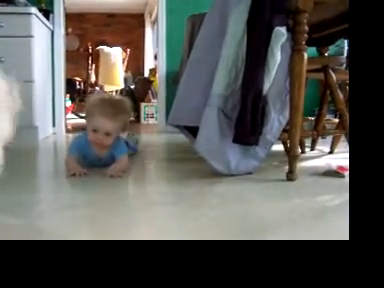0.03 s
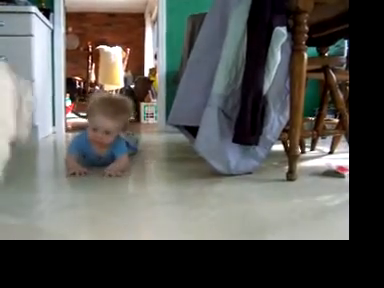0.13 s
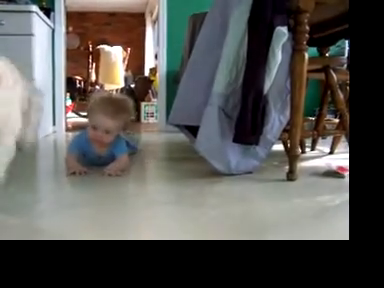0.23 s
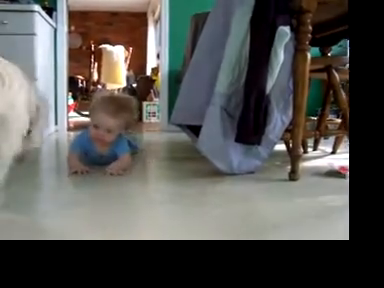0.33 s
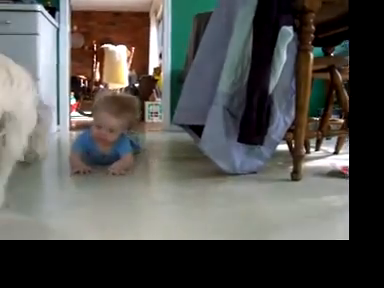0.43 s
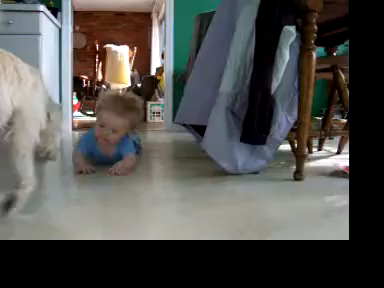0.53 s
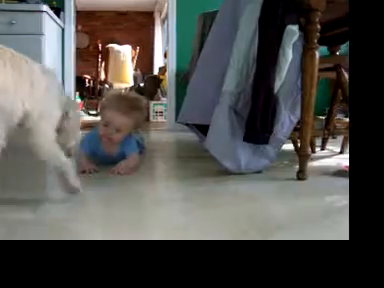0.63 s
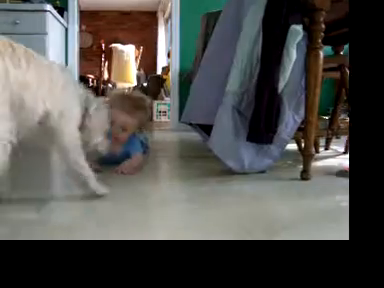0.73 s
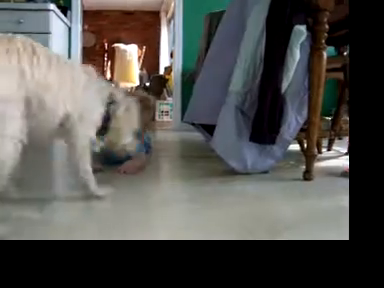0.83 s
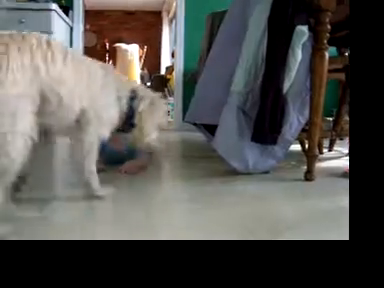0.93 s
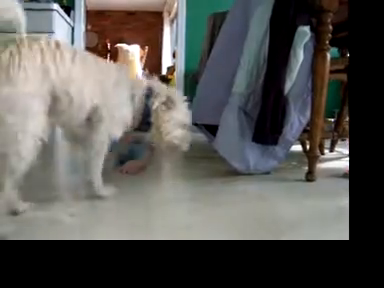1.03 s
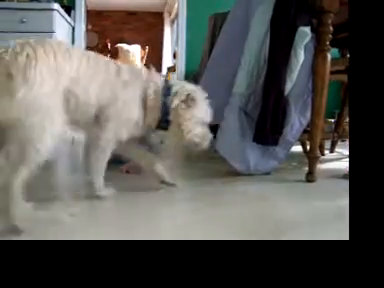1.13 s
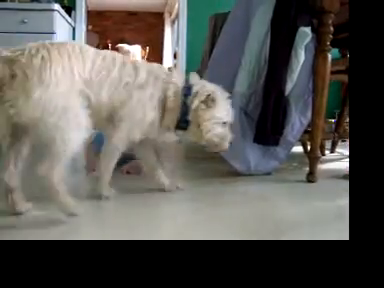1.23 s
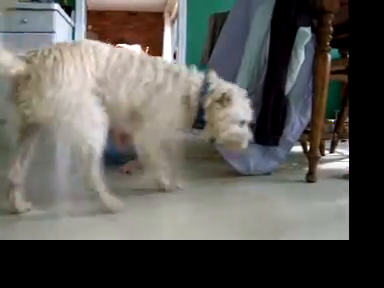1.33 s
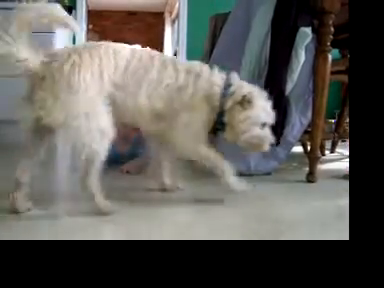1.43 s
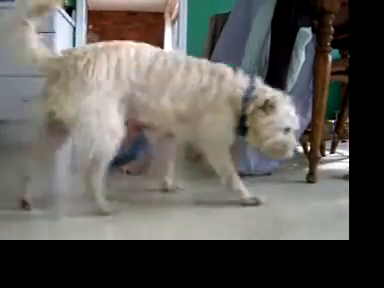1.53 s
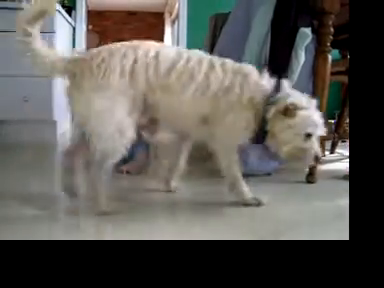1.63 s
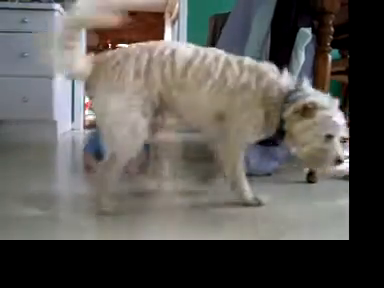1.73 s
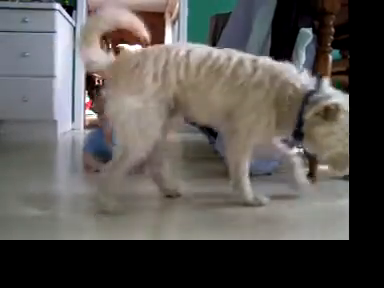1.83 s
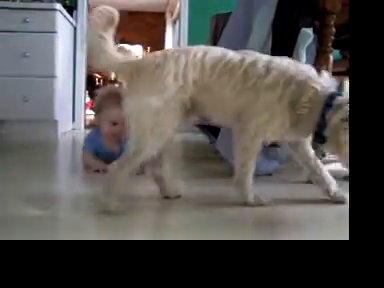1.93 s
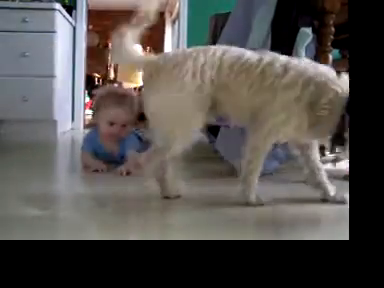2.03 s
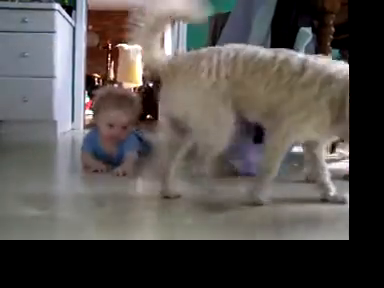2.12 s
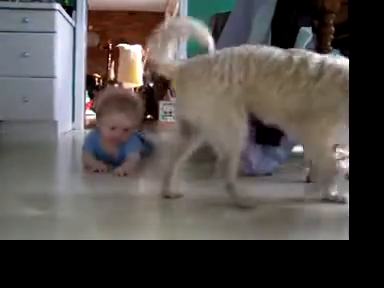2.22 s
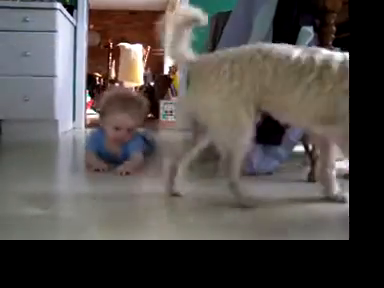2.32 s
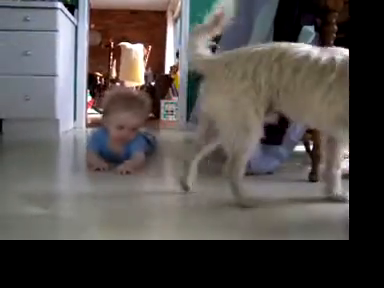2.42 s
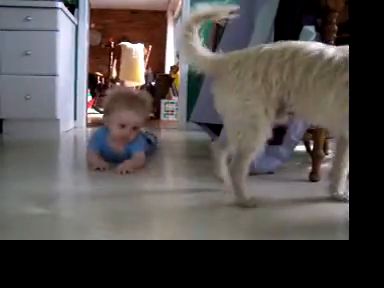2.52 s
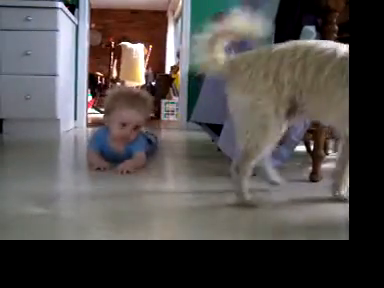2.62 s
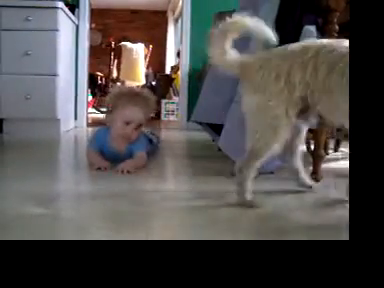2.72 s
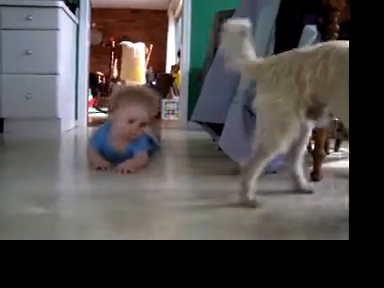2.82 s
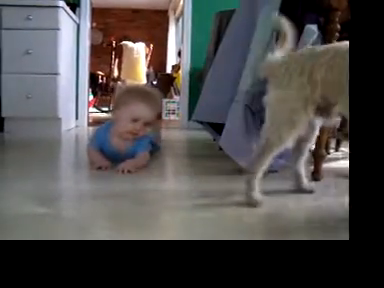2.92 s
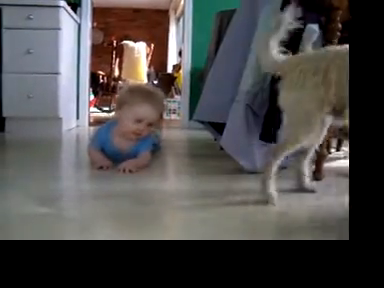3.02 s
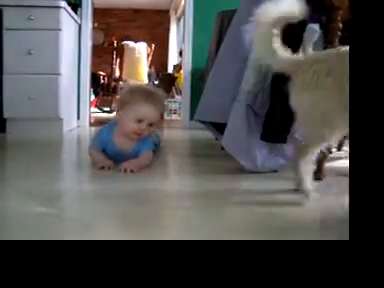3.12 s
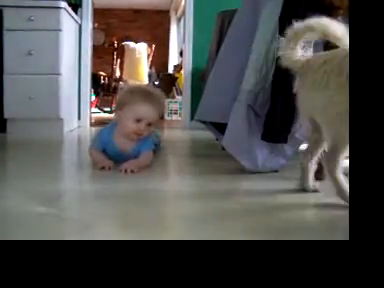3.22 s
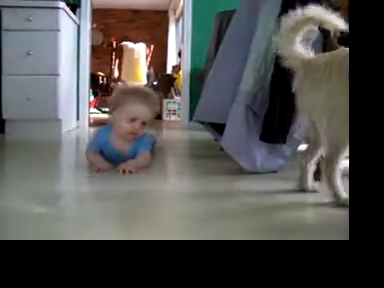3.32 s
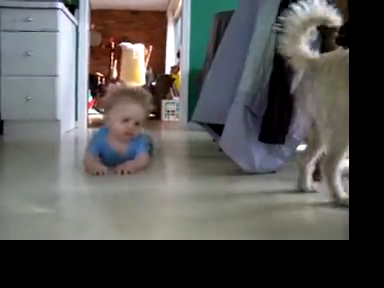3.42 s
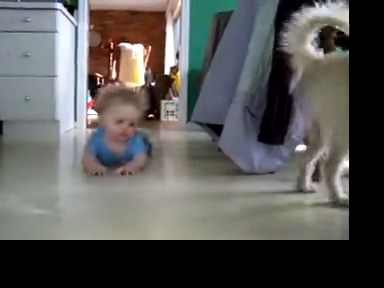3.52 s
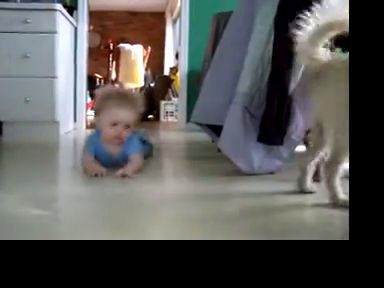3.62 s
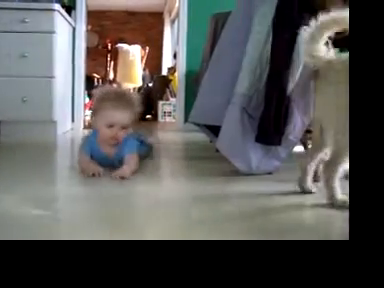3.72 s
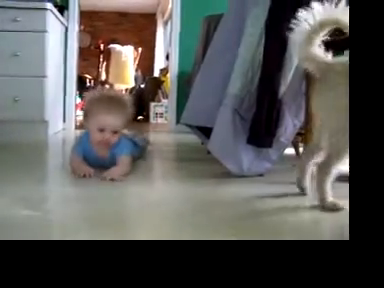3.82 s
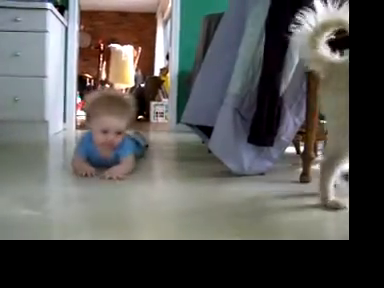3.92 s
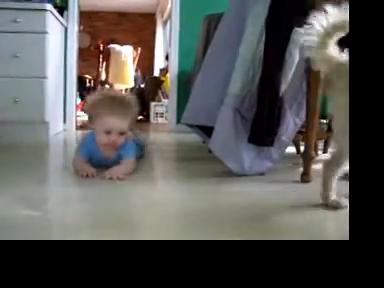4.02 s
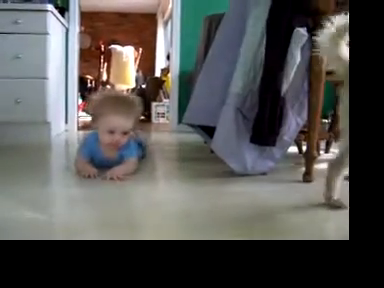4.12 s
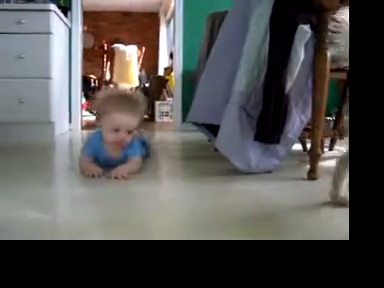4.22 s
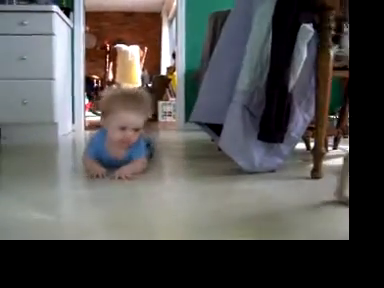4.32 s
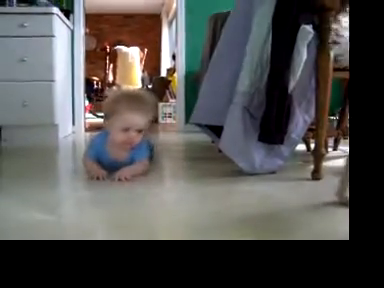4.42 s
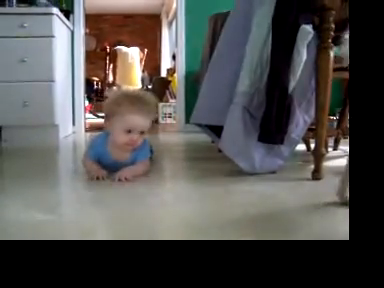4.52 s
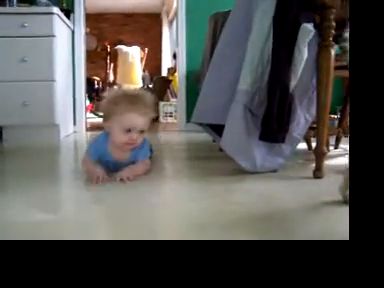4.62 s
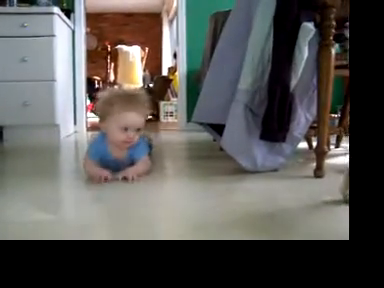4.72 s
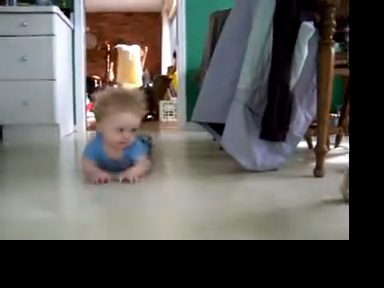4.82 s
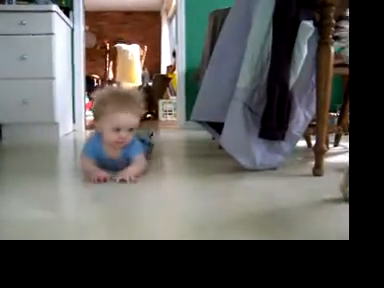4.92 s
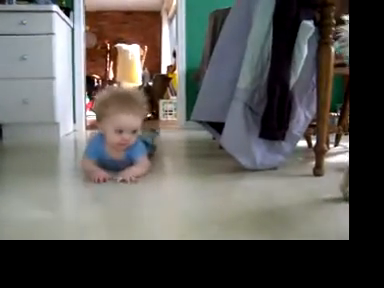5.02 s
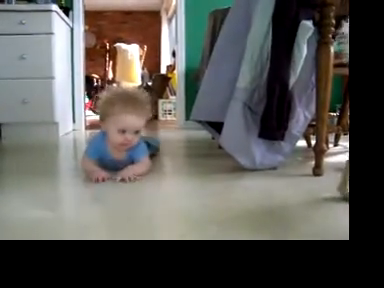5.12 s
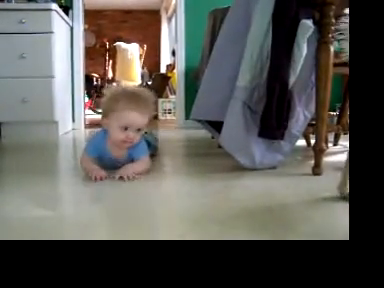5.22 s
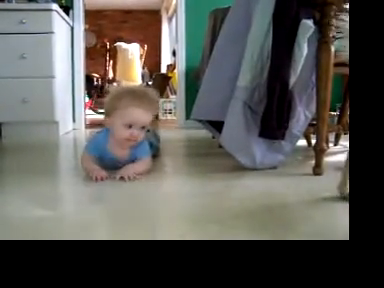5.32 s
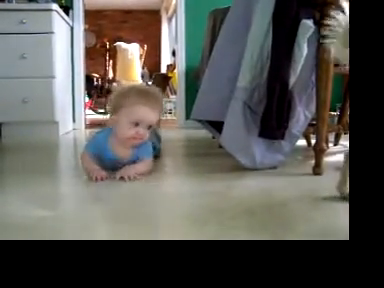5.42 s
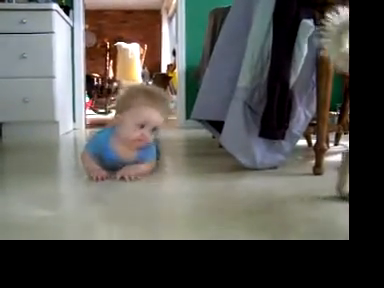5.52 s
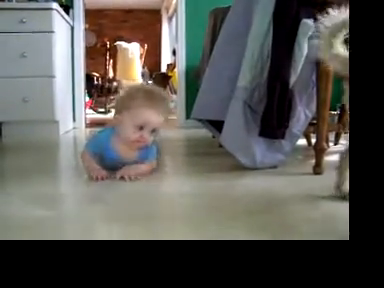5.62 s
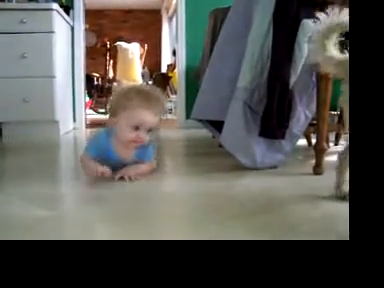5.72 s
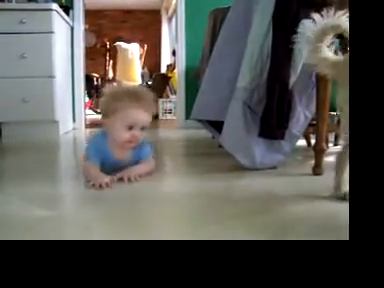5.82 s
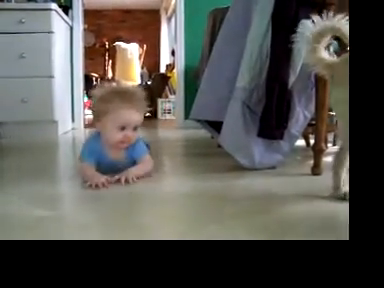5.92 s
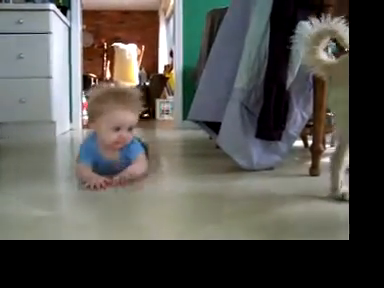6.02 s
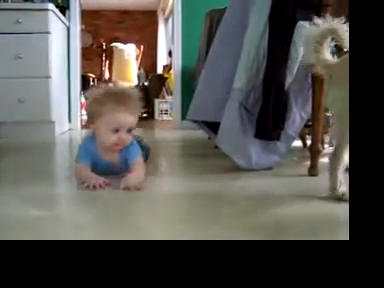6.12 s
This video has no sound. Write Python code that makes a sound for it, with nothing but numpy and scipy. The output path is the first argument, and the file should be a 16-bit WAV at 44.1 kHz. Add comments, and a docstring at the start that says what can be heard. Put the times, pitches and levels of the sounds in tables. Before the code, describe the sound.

Uneven, dry clicking of dog claws on a hard kitchen floor, busy and close at first, mixed with short rasping slips, hissing fur and a few very quiet metallic tag clinks. The dog then slows off to the side, leaving isolated ticks, duller woody knocks and more room echo. The narrow-band microphone slightly overloads on the sharpest clicks, over a faint airy background and low rumble.

```python
"""Dog's claws on a hard kitchen floor

A dog walks past a low microphone: claws ring as struck bodies and skid by stick-slip, pads and fur hiss,
collar tags clink as damped metal modes. It stops by a wooden chair and steps about, with duller knocks;
off to the side, more of the room and less of the claws is heard. The bright room answers in noise tails,
over steady room air and a low wavering rumble; the sharpest ticks overload the narrow-band microphone."""
import sys
import numpy as np
from scipy import signal
from scipy.fft import rfft, irfft, next_fast_len
from scipy.io import wavfile
from scipy.ndimage import map_coordinates

SR = 44100
rng = np.random.default_rng(int(sys.argv[2]) if len(sys.argv) > 2 else 0)


def wav_out(sig):
    """Save sig, one row per channel (or a flat mono array), as 16-bit PCM at SR to the path in sys.argv[1]."""
    wavfile.write(sys.argv[1], SR, np.round(np.clip(np.atleast_2d(sig).T, -1, 1) * 32767).astype(np.int16))


N = 272097

# colour of a struck claw: (frequency [Hz], gain [dB])
CLAW_COLOUR = [(100, -18), (600, -13.5), (1900, -11.5), (2600, -10), (3400, 0), (4500, -0.5), (6500, -1.5),
               (7500, -5.5), (8500, -6)]
# response of the microphone, falling steeply in the treble: (frequency [Hz], gain [dB])
MICROPHONE_RESPONSE = [(7000, -0.5), (8000, -7), (8600, -17), (9000, -28), (9600, -70.5)]


def ticks():
    """A claw hits the floor and rings for a few cycles; the floor's mirror image follows at once."""
    # clear claw strikes: (time [s], peak of the direct sound [dB], resonance [Hz])
    strikes = [(0.0507, -9.5, 4860), (0.056, -10, 5130), (0.0746, -13.0, 5540), (0.0788, -15.0, 5500),
               (0.0897, -18, 5860), (0.1115, -1, 6160), (0.3114, -19.5, 6190), (0.4254, -13, 5100),
               (0.4313, -13.0, 5270), (0.4997, -17, 5280), (0.6055, -30, 4630), (0.743, -4.5, 6900),
               (0.8342, 1.5, 4800), (0.8586, -4, 5230), (0.868, -2, 4940), (1.0204, -22, 5100),
               (1.2094, -4.5, 5240), (1.284, -15.5, 5030), (1.3167, -18, 5120), (1.3541, -4, 5350),
               (1.6229, -9.5, 5170), (1.6439, 0, 5260), (1.8931, -13, 6660), (1.9903, -14, 5020),
               (2.0968, -16, 4740), (2.259, -11, 5090), (2.2784, -15, 6700), (2.2836, -9, 6200),
               (2.4148, -4, 7500), (2.509, -3, 5520), (2.8464, -14.5, 4960), (2.888, -10, 5900),
               (2.9564, -12.5, 5550), (3.0783, -13.5, 5330), (3.0882, -13, 5300), (3.6614, -10, 5640),
               (3.952, -1.5, 4800), (4.0566, -14, 4530), (4.6409, -18.5, 4500), (5.2063, -9, 5100),
               (5.2158, -12, 5120), (5.419, -11, 4860), (5.4265, -10.5, 5040), (5.4704, -7.5, 6400),
               (5.6078, -13.5, 4970), (5.8904, 0.5, 6100), (5.9044, -3.5, 6240)]
    hard_db, thud_db = -1.5, -26  # a strike above hard_db also sounds the floor, weaker by thud_db
    out = np.zeros(N)
    for s, db, hz in strikes:
        force = contact(chatter=0.089, life=0.0019)
        mirror_delay = rng.uniform(.0005, .001)  # s
        force[round(mirror_delay * SR)] += .35
        claw = peaked(body(force, CLAW_COLOUR, hz, q=9.1), db)
        add(out, s, in_room(claw, wet_db=room_db_at(s)))
        if db > hard_db:
            thud = peaked(wood(hz=2200, bass_db=4.5), db + thud_db)
            add(out, s, in_room(thud, wet_db=-5.0))
    return out


def patter():
    """Light stray claw touches, thinning out as the dog slows down and moves aside."""
    # spells of touches: (start [s], end [s], touches per second [1/s], strongest direct peak [dB])
    spells = [(0.449, 1.451, 14.0, -22), (1.654, 3.453, 7.4, -23), (3.504, 6.102, 5.1, -32)]
    range_db = 11.5  # the weakest touch lies this far under the strongest
    out = np.zeros(N)
    for start, end, rate, db in spells:
        count = round((end - start) * rate)
        for when, softness, pitch in rng.random(size=(count, 3)):
            s = start + (end - start) * when
            force = contact(chatter=0.33, life=0.001)
            touch = body(force, CLAW_COLOUR, 4700 + 900 * pitch, q=4.0)
            touch = peaked(touch, db - range_db * softness)
            add(out, s, in_room(touch, wet_db=room_db_at(s)))
    return out


def skids():
    """A sliding claw sticks and slips at an uneven rate, in a short swell."""
    # slides: (middle [s], half-length [s], direct rms at the middle [dB], resonance [Hz])
    slides = [(0.014, 0.02, -30.5, 4300), (0.161, 0.0049, -25.5, 5200), (0.413, 0.02, -31.5, 2780),
              (0.601, 0.0091, -27, 4370), (.858, 0.015, -26.5, 4750), (0.888, 0.0022, -17.5, 4600),
              (1.023, 0.011, -31, 4500), (1.206, 0.0094, -21, 5100), (1.22, 0.015, -19, 4670),
              (1.394, 0.0041, -18.5, 4510), (1.629, 0.021, -29, 4950), (1.645, 0.0048, -17, 5200),
              (1.783, 0.0079, -30.5, 5060), (1.989, 0.0054, -33, 5050), (2.076, 0.0096, -20, 4640),
              (2.078, 0.0021, -17.5, 4600), (2.094, 0.0075, -22, 4700), (2.258, 0.013, -27.5, 5400),
              (2.279, 0.011, -29, 6400), (2.406, .007, -28, 6300), (2.511, 0.018, -20, 5700),
              (2.827, 0.0092, -26, 3800), (3.084, 0.021, -27, 5850), (3.659, 0.016, -26.5, 5300),
              (3.917, 0.038, -36.5, 4100), (5.426, 0.016, -24.5, 4280), (5.474, 0.004, -20, 5300),
              (5.779, 0.0061, -35, 4700), (5.892, 0.0043, -9.5, 6000), (5.957, 0.033, -26, 5630),
              (6.098, 0.018, -29.5, 5100)]
    # colour of a sliding claw: (frequency [Hz], gain [dB])
    rasp_colour = [(100, -31.5), (700, -12.5), (1500, -20), (2400, -13), (2900, -4.5), (4500, -1),
                   (6400, -2.5), (7300, -8.5), (8500, -10)]
    slip_hz, scatter_db = 934, 2.5  # typical slips a second; spread of their strengths
    room_offset_db = -1.5  # room level against that of a tick
    out = np.zeros(N)
    t = np.arange(SR // 8) / SR - 1 / 16
    for s, half_length, db, hz in slides:
        drift = .2 * rng.standard_normal() + .18 * wobble(400, size=len(t))
        rate = slip_hz * np.exp(drift)
        # one impulse each time the running slip count passes a whole number
        slips = np.diff(np.floor(np.cumsum(rate) / SR), prepend=0)
        slips = slips * amp(scatter_db * rng.standard_normal(len(t)))
        force = unit(slips) + .5 * rng.standard_normal(len(t))
        rasp = unit(body(force, rasp_colour, hz, q=4.0)[:len(t)])
        skid = amp(db) * rasp * np.exp(-2 * (t / half_length) ** 2)
        skid = skid[t + s >= 0]
        add(out, s + t[0], in_room(skid, wet_db=room_db_at(s) + room_offset_db))
    return out


def knocks():
    """Heavier blows of paws and chair sound the wood and fill the room."""
    # blows: (time [s], direct peak [dB], resonance [Hz], added bass [dB], room over direct sound [dB])
    blows = [(.004, -23, 2600, 6.5, 10), (2.372, -19.5, 1700, -7, -1.5), (2.402, -9, 2600, -2, 2.5),
             (2.414, -22.5, 1600, 3.5, 8.5), (3.952, -9.5, 2450, -5.5, 7.5), (4.834, -20.5, 2400, 9, 2.5),
             (5.085, -19.5, 1880, 3, 7), (5.208, -17.5, 2200, 1.5, 7), (5.426, -12, 2100, -10, 3),
             (5.608, -20.5, 1000, 0.5, 6), (5.935, -26, 600, 0, 7.5)]
    out = np.zeros(N)
    for s, db, hz, bass_db, room_db in blows:
        knock = peaked(wood(hz, bass_db), db)
        add(out, s, in_room(knock, wet_db=room_db, build=0.0036))
    return out


def tags():
    """The metal tags swing and ring in three modes until they fall back against the fur."""
    # clinks: (time [s], low mode [dB], middle mode [dB], high mode [dB], free ringing [s])
    clinks = [(.743, -50.5, -42.5, -34.5, 0.097), (.887, -45.5, -37.5, -46, .24),
              (1.894, -54, -46, -44, 0.025), (2.283, -53, -40, -33, 0.1), (2.402, -55, -41.5, -45, 0.18),
              (2.847, -45, -56, -58, 0.024), (2.888, -70, -42.5, -54, .2)]
    # modes of the tags: (frequency [Hz], time to fall by 60 dB [s])
    tag_modes = [(1495, 0.39), (3270, 0.97), (3660, 0.4)]
    swing_db = 1.0  # random waver of each mode
    mute_s = .025  # how fast the fur stills a tag
    out, t = np.zeros(N), np.arange(SR // 2) / SR
    for s, *levels, ring in clinks:
        ringing = np.zeros(len(t))
        for db, (hz, t60) in zip(levels, tag_modes):
            level_db = db - 60 * t / t60 + swing_db * wobble(40, size=len(t))
            ringing += amp(level_db) * np.sin(2 * np.pi * hz * t)
        damping = np.exp(-np.maximum(t - ring, 0) / mute_s)
        add(out, s, in_room(ringing * damping, wet_db=-21))
    return out


def shuffle():
    """Pads and fur brush the floor: a soft, grainy hiss that swells and fades with each stroke."""
    # strokes over the floor: (middle [s], half-length [s], level at the middle [dB])
    strokes = [(0.098, 0.099, -40), (.62, 0.24, -43), (1.163, 0.3, -40.5), (1.682, 0.035, -37),
               (2.25, 0.6, -44.5), (2.975, 0.29, -41), (3.372, .05, -45), (3.595, 0.082, -38),
               (3.773, 0.1, -39), (4.438, 0.25, -42.5), (4.86, 0.076, -37), (5.137, 0.058, -42.5),
               (5.49, 0.28, -37.5)]
    # colour of the brushing: (frequency [Hz], spectral density [dB])
    brush_colour = [(700, -25), (1400, -15), (2300, -11), (3000, -5.5), (4300, -0.5), (5600, -0.5),
                    (6700, -8.5), (7600, -11.5), (9000, -18)]
    fur_db = -54.5  # constant hiss under the strokes
    t = np.arange(N) / SR
    power = amp(fur_db) ** 2
    for s, half_length, db in strokes:
        power = power + amp(db) ** 2 * np.exp(-2 * ((t - s) / half_length) ** 2)
    graininess_db = 20 / np.log(10) * 0 + 2.2 * wobble(500) + 1.3 * wobble(30)
    grains = rng.standard_normal(N) * amp(graininess_db)
    return np.sqrt(power) * unit(filtered(grains, lambda hz: amp(along(brush_colour, hz))))


def ambience():
    """Steady room air over a low rumble that wavers at random and swells once."""
    # colour of the room air: (frequency [Hz], spectral density [dB])
    air_colour = [(120, -15), (250, -5), (370, 0.5), (520, 1.5), (750, 0.5), (1200, -4.5), (2300, -6),
                  (4100, -7), (5300, -5.5), (7000, -9.5), (8200, -9), (9000, -19.5)]
    # colour of the rumble: (frequency [Hz], spectral density [dB])
    rumble_colour = [(13, -40), (22, -11), (48, 3), (81, -2.5), (124, 2.5), (300, -12), (390, -35.5),
                     (660, -120)]
    air_db, rumble_db = -49.5, -47.0  # rms, the rumble's before its waver and swell
    swing_db, swing_rate = 1.35, 7.0  # typical waver of the rumble; random knots a second
    # the rumble swells briefly under the last steps
    swell_s, swell_length_s, swell_rise_db = 6.02, 0.11, 4.5
    t = np.arange(N) / SR
    swell_db = swell_rise_db * np.exp(-((t - swell_s) / swell_length_s) ** 2)
    air = amp(air_db) * coloured_noise(air_colour)
    level_db = rumble_db + swell_db + swing_db * wobble(swing_rate)
    return air + amp(level_db) * coloured_noise(rumble_colour)


def in_room(sound, wet_db, build=0.0083):
    """The sound and a fresh room tail, which builds up (build [s]) as the walls answer."""
    # decay of the room: (frequency [Hz], time to fall by 60 dB [s])
    room_decay = [(150, 0.42), (1000, 0.54), (5000, 0.42), (9000, 0.36)]
    hz, t, z = signal.stft(rng.standard_normal(SR // 2), SR, nperseg=256)
    fade = amp(-60 * t / along(room_decay, hz)[:, None])
    rise = 1 - np.exp(-(t / build) ** 2)
    tail = signal.istft(z * fade * rise, SR, nperseg=256)[1]
    response = amp(wet_db) * tail / np.linalg.norm(tail)
    response[0] += 1  # direct sound
    return signal.fftconvolve(sound, response)


def room_db_at(s):
    """How strongly the room answers where the dog is at time s."""
    # room over direct sound, strongest once the dog is off to the side: (time [s], level [dB])
    room_level = [(0, -12.5), (1.4, -9), (2.4, -8.5), (3.1, -11.5), (3.6, -3.5), (6.1, -3.5)]
    return np.interp(s, *np.transpose(room_level))


def contact(chatter, life):
    """One sharp blow followed by a brief chatter of tiny contacts, dying away over life [s]."""
    t = np.arange(SR // 50) / SR
    force = chatter * rng.standard_normal(len(t)) * np.exp(-t / life)
    force[0] += 1
    return force


def body(force, colour, hz, q):
    """Causal (minimum-phase) answer to a force of a body with a broad colour and one resonance."""
    size = 1024
    f = np.fft.rfftfreq(size, 1 / SR) + 1
    resonance = 1 / np.sqrt(1 + (q * (f / hz - hz / f)) ** 2) ** .5
    gain = amp(along(colour, f)) * resonance
    top_hz = MICROPHONE_RESPONSE[-1][0]
    gain = gain / (1 + (f / top_hz) ** 20)
    # folding the cepstrum forward in time makes the response causal
    cepstrum = irfft(np.log(gain + 1e-6))
    cepstrum[1:size // 2] *= 2
    cepstrum[size // 2 + 1:] = 0
    return signal.fftconvolve(force, irfft(np.exp(rfft(cepstrum))))


def wood(hz, bass_db):
    """One clean blow on wood; more weight gives more bass."""
    # colour of the wood: (frequency [Hz], gain [dB])
    wood_colour = [(80, -4.5), (230, 0), (370, 1.5), (510, 3), (720, -2), (1250, -6), (1750, -2),
                   (2400, -2), (3500, -3), (8000, -16.5)]
    colour = [(f, level + bass_db / (1 + (f / 900) ** 2)) for f, level in wood_colour]
    return body(contact(chatter=0.08, life=0.0023), colour, hz, q=0.43)


def coloured_noise(colour):
    """Noise of rms 1 with the given spectrum."""
    return unit(filtered(rng.standard_normal(N), lambda hz: amp(along(colour, hz))))


def wobble(rate, size=N):
    """A smooth random curve of size samples, rate knots a second."""
    knots = rng.standard_normal(int(size * rate / SR) + 4)
    return map_coordinates(knots, [np.arange(size) * rate / SR])


def filtered(x, gain):
    """x through a zero-phase gain of frequency."""
    size = next_fast_len(len(x) + 8192)
    return irfft(rfft(x, size) * gain(np.fft.rfftfreq(size, 1 / SR)), size)[:len(x)]


def along(points, hz):
    """(frequency [Hz], value) points read on a log frequency axis."""
    f, v = np.transpose(points)
    return np.interp(np.log(hz + 1), np.log(f), v)


def amp(db):
    """Decibels to gain."""
    return 10 ** (np.asarray(db) / 20)


def unit(x):
    """Scaled to rms 1."""
    return x / np.sqrt(np.mean(x ** 2) + 1e-20)


def peaked(sound, db):
    """The sound scaled to a peak level."""
    return amp(db) * sound / np.abs(sound).max()


def add(track, s, sound):
    """Mix a sound into the track at time s."""
    start = max(round(s * SR), 0)
    part = sound[:max(N - start, 0)]
    track[start:start + len(part)] += part


def scene():
    """Everything at the one microphone."""
    dog = ticks() + patter() + skids() + knocks() + tags() + shuffle()
    return (dog + ambience())[None]


def record(dry):
    """The microphone loses the top treble, and the sharpest peaks clip."""
    top_hz = 16000  # steep upper limit after the clipping
    heard = filtered(dry[0], lambda hz: amp(along(MICROPHONE_RESPONSE, hz)))
    clipped = np.clip(heard, -.72, .72)
    return filtered(clipped, lambda hz: 1 / (1 + (hz / top_hz) ** 80))[None]


dry = scene()
out = record(dry)
wav_out(out)
```